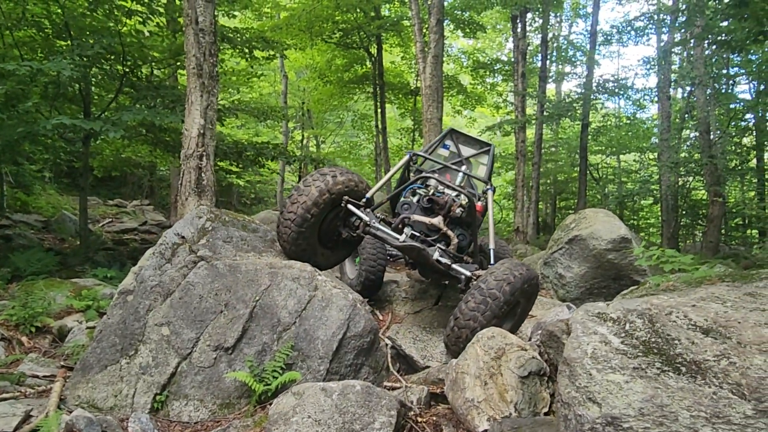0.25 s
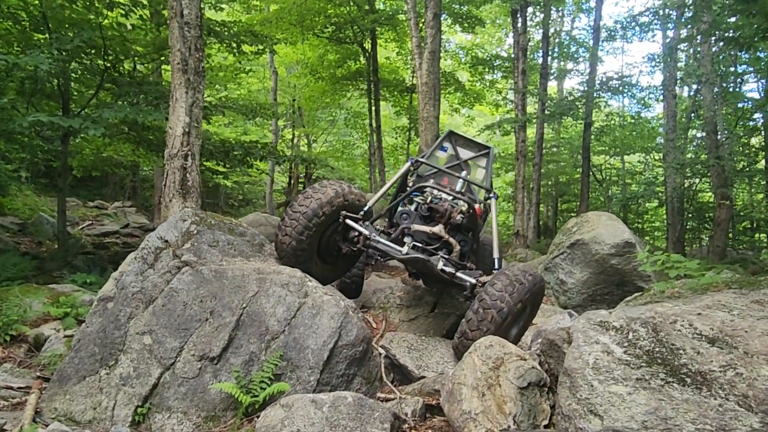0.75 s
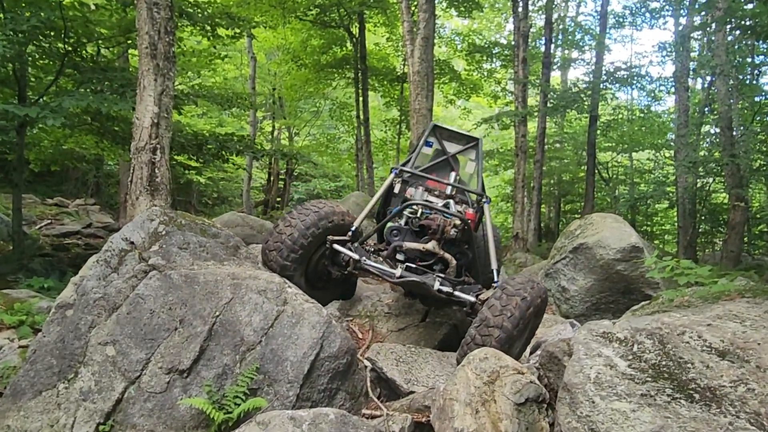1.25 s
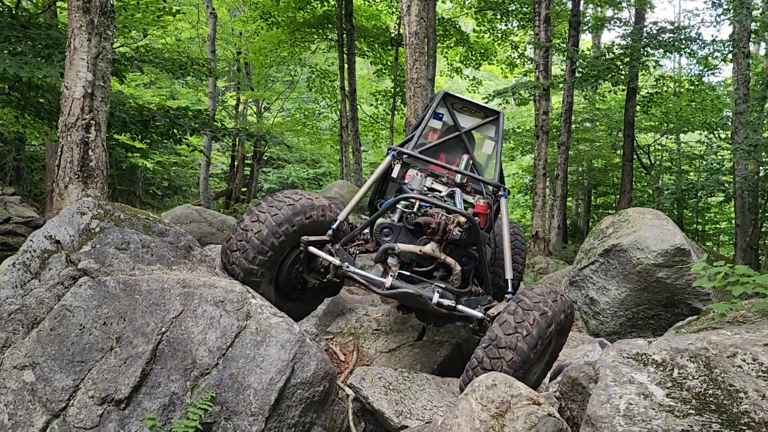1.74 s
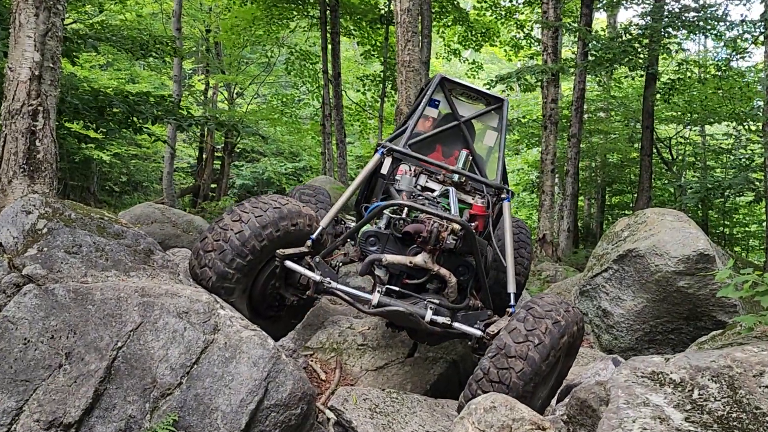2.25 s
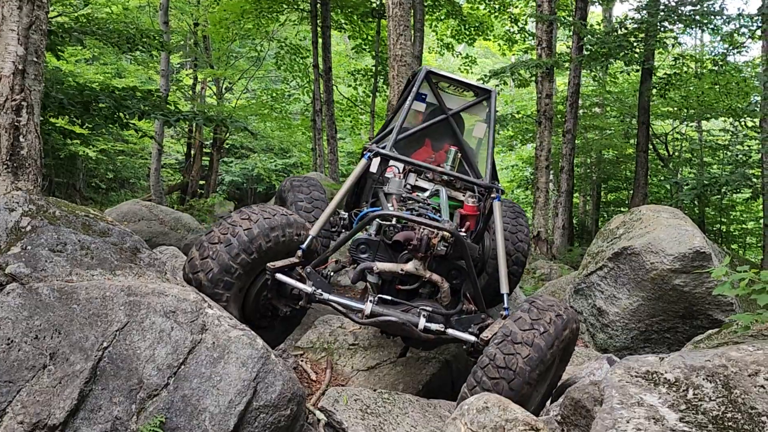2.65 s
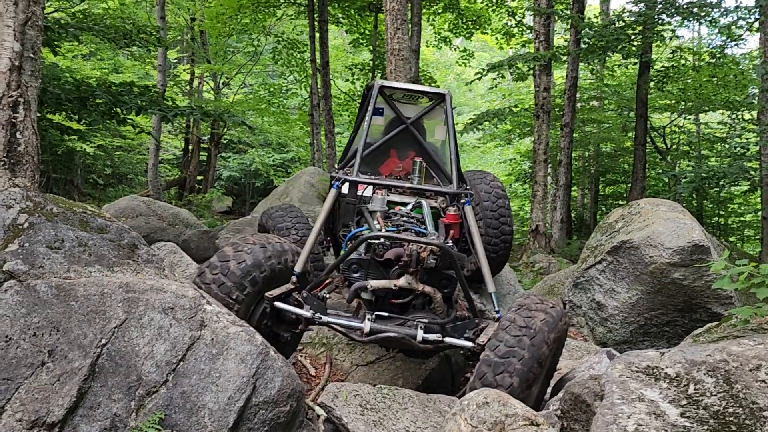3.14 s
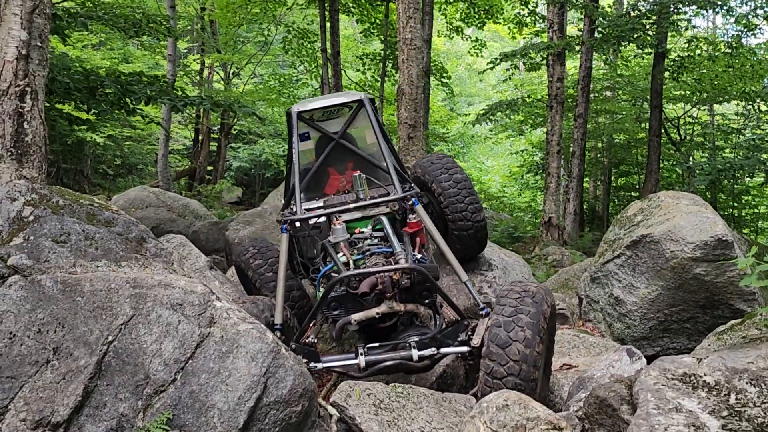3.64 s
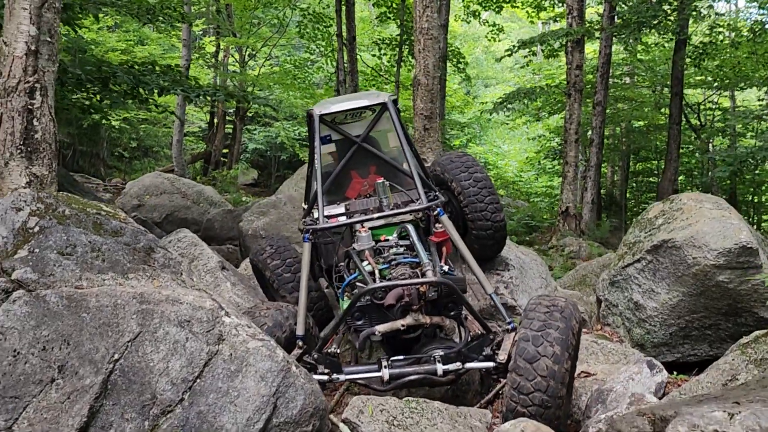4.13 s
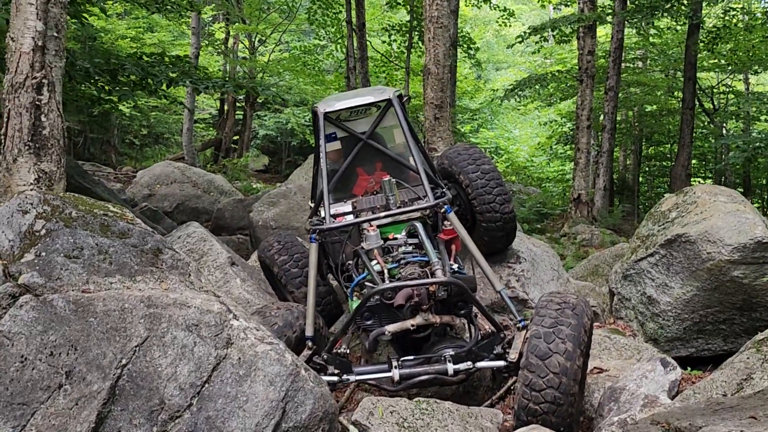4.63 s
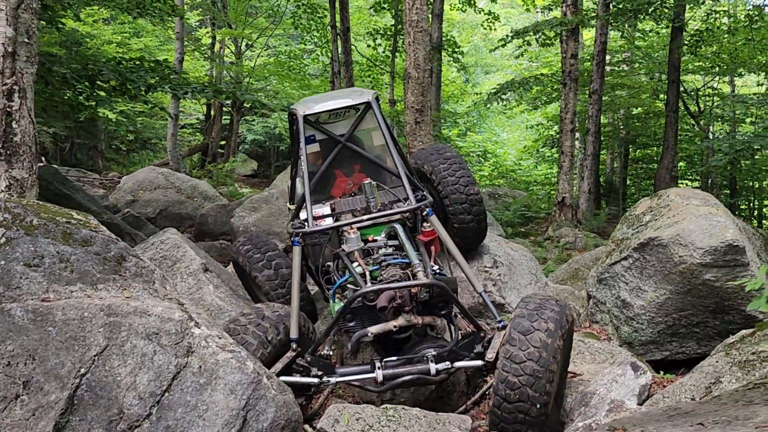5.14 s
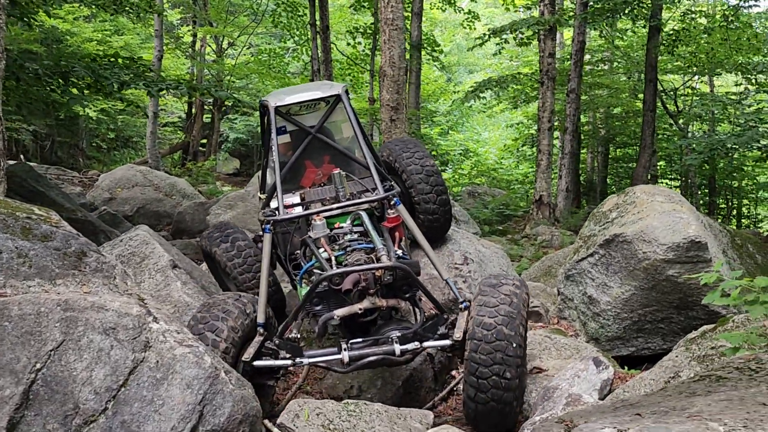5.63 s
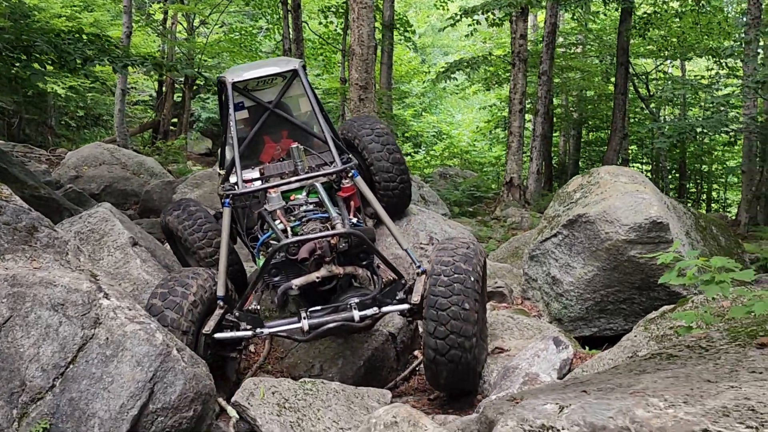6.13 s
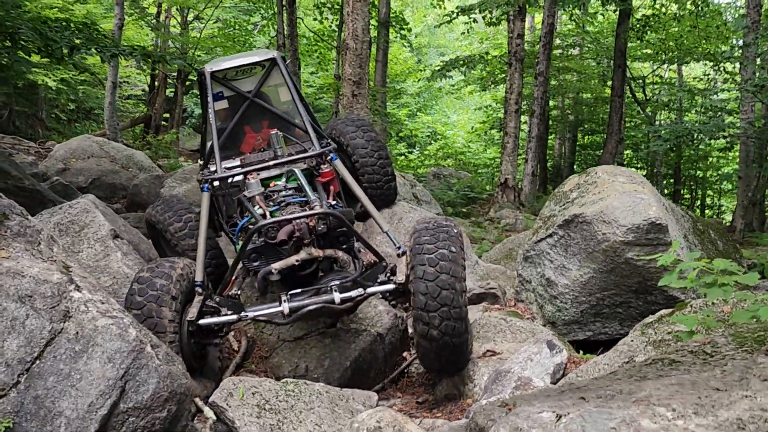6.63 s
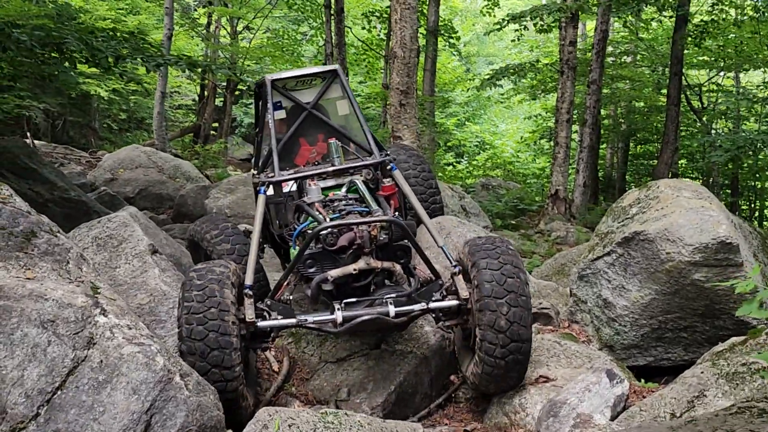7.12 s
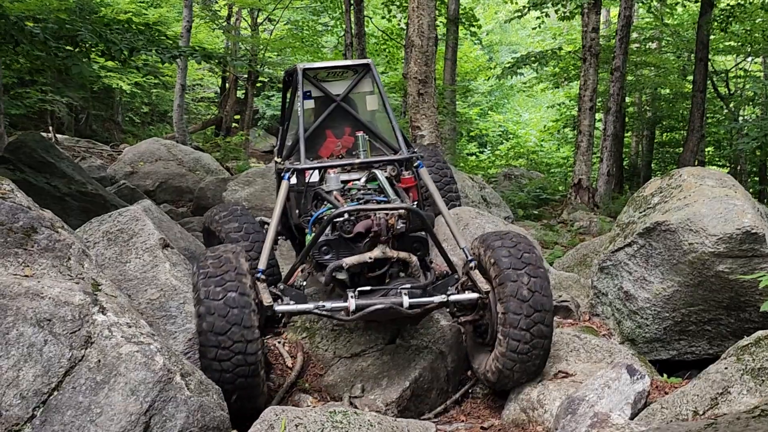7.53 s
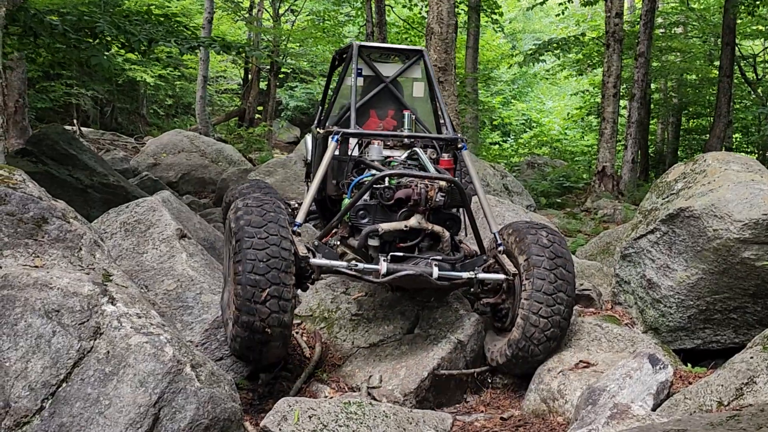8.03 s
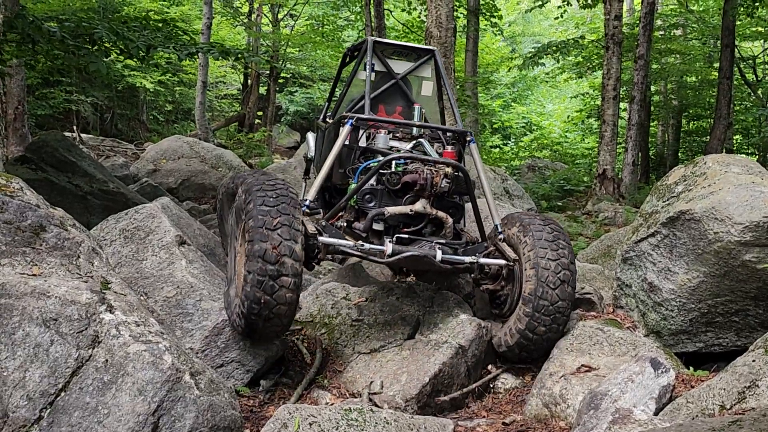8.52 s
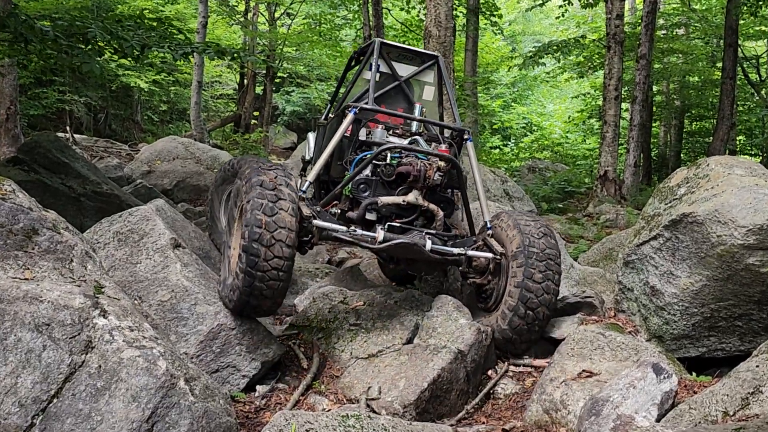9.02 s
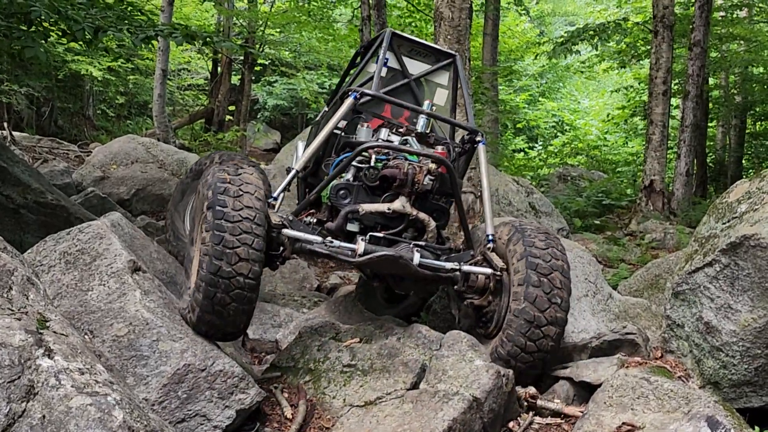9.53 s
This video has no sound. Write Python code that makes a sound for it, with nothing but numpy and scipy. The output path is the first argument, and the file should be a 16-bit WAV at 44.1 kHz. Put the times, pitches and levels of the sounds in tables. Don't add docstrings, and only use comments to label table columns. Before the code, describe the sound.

Close by among trees, a rock-crawling buggy's lumpy engine roars, drops to a burble and roars again, hissing, rattling and chirping on rock.

```python
import sys
import numpy as np
from scipy import signal
from scipy.fft import rfft, irfft, next_fast_len
from scipy.io import wavfile
from scipy.ndimage import uniform_filter1d

SR = 44100
rng = np.random.default_rng(int(sys.argv[2]) if len(sys.argv) > 2 else 0)


def attenuation_scalar(level_db):
    decades = np.asarray(level_db, float) / 20
    return 10 ** decades


def wrap_up_sound(samples):
    columns = np.atleast_2d(samples).T
    tamed = np.clip(columns, -1, 1)
    steps = np.round(tamed * 32767).astype(np.int16)
    wavfile.write(sys.argv[1], SR, steps)


N = 430857
T = np.arange(N) / SR

# (centre [Hz], width [Hz], depth [0-1])
GROUND_DIPS = [(1860, 110, .88), (2600, 90, .35), (3270, 90, .25)]
# (frequency [Hz], phase [rad])
PORT_LAG = [(0, 0), (1030, 0.2), (1290, 0.9), (1550, 0.7), (1980, 0.7), (2410, 5.5), (2930, 6.1),
            (5770, 9.1), (6630, 10.5), (7840, 15.6), (8700, 16.7), (11900, 18.6), (14700, 22.6),
            (16000, 24.3)]
# (frequency [Hz], level [dB])
PORT_DB = [(60, 0.5), (110, 0.0), (200, -0.5), (380, -0.5), (700, -1.0), (1290, -1.5), (2380, -2.0),
           (4400, -7.5), (8120, -3.0), (15000, -2.5)]
# (frequency [Hz], likeness [0-1])
ALIKE = [(300, .98), (700, .95), (1500, .88), (3000, .7), (8000, .58), (16000, .5)]

# (frequency [Hz], density [dB/Hz])
RATTLE = [(45, -4.5), (88, 3.5), (150, 2), (240, -3), (355, -15), (679, -7.5), (764, -17.5), (1960, -20),
          (2200, -18), (3660, -26), (5420, -21.5), (10400, -38), (15000, -65), (16300, -61)]
# (time [s], length [s], start pitch [Hz], width [Hz], level [dB])
SQUEAKS = [
    (3.73, .22, 3040, 90, -34),
    (3.715, .25, 2740, 200, -40),
    (5.11, .14, 5050, 300, -18.5),
    (5.62, .05, 5230, 200, -24.5),
    (5.76, .42, 5270, 260, -23),
    (6.42, .07, 5200, 250, -26),
    (6.5, .07, 5570, 200, -21.5),
    (8.865, .32, 10800, 110, -29),
    (9.61, .03, 10550, 110, -39),
    (9.68, .25, 10520, 90, -39),
]
# (time [s], pitch [Hz], level [dB])
FAN = [
    (0, 4100, -39),
    (.15, 3780, -41),
    (.45, 4000, -40),
    (.8, 4500, -39),
    (1.05, 4780, -36),
    (1.3, 4700, -40),
    (1.45, 4250, -35),
    (1.66, 3790, -45),
]
# (time [s], pitch [Hz], level [dB])
GEAR = [
    (4.0, 2250, -42),
    (4.25, 2185, -32),
    (4.55, 2135, -32),
    (4.85, 2180, -29.5),
    (4.95, 2130, -39),
    (6, 2130, -35),
    (6.6, 2120, -39),
    (7.1, 2120, -37),
]

# (frequency [Hz], density [dB/Hz])
JET = [(500, -43), (900, -31), (1300, -30.5), (2100, -5.5), (3300, -10), (5000, 0.5), (7400, -13.5),
       (8500, -14.5), (10300, -26), (12000, -14), (14000, -13), (16000, -13.5)]
# (frequency [Hz], width [Hz], level [dB])
FRAME = [(2215, 67, -7), (2960, 150, -9), (3600, 130, -11), (4033, 220, -2.2), (4570, 83, -18.5),
         (5580, 200, -5), (6220, 150, -5), (7575, 660, -3)]
# (frequency [Hz], width [Hz], level [dB])
CLANG = [(1054, 260, -7), (1323, 54, -6.5), (1558, 89, -1.5)]
# (frequency [Hz], width [Hz], level [dB])
HEADER = [(464, 46.3, 10), (498, 38, 2.5), (529, 26.5, 0.5), (658, 78, -3.5)]
# (frequency [Hz], width [Hz], level [dB])
MUFFLER = [(252.7, 18.2, 0.37), (333.3, 53, 0.1)]
# (frequency [Hz], width [Hz], level [dB])
SKID_PLATE = [(148, 36, 0.1)]
HEADER_RUNG_DB = [-8, -10, 0, -6]
CAN_RUNG_DB = [-6, 0, -7, -1]
CLANG_RUNG_DB = [-5, -2.5, 0, -2]
PLATE_RUNG_DB = [-18, 0, -18, -14]
# (time [s], level [dB])
HEADERS_IN_VIEW = [(0, 5), (.3, 0.5), (.5, 8.5), (1.2, 12), (1.5, -4.5), (3.2, -1.5), (3.8, 7), (4.6, -5),
                   (7.2, -4.5), (7.7, -1), (8.3, 1), (9.77, -2.5)]
# (gas level [dB], share [0-1])
PULSED_BY_GAS = [(-51, 0.45), (-35, 1), (-53.5, 0.85), (-37.5, 0.91)]

# (frequency [Hz], level [dB])
BASS = [(25, -36), (50, -26), (92, -16.5), (106, -21.5), (121, -16), (138, -21), (153, -24), (180, -19.5)]
ORDER_DB = [1, 1.3, -4.5]
# (order [-], level [dB])
UPPER = [(4, 3.5), (5, 3.25), (6, -0.5), (7, -2.5), (8, -6), (9, -38.5), (10, -49)]
# (frequency [Hz], level [dB])
PIPE = [(105, 2), (135, -1), (185, 0), (230, -2.9), (280, -2.5), (330, 3), (385, 3.5), (450, -52)]
NOTE_SCATTER_DB = [.6, 1.1]
# (time [s], silencer can in view [dB], boom off near rock [dB])
STANCE = [(0, -7, 4.5), (1.0, -2, 3), (1.8, -21.5, 0), (2.7, -11.5, -1.5), (3.3, 20, 1), (4.4, 10, 5),
          (5.1, 16, 5), (5.7, 11, 3.5), (6.3, 6.5, -2), (7.1, 6.5, 0), (7.6, 15, 3.5), (8.6, 14.5, 0),
          (9.3, 17, -6.5), (9.77, 18, -5.5)]
# (time [s], thump level [dB], gas level [dB])
LOAD = [(0, -7, -47.5), (.12, -7.5, -42.5), (.45, 0, -25.5), (1.09, -4, -34), (1.42, -6.5, -48),
        (1.66, -3.5, -41), (1.9, -0.5, -33), (3.15, 0.5, -32.5), (3.45, -7, -47), (3.75, -11, -53),
        (4.11, -12, -46.5), (4.75, -2.5, -28.5), (5.45, -2.5, -31.5), (6.67, -2, -32), (7.2, -7, -42.5),
        (7.36, -1.5, -20.5), (7.9, 2, -26), (9.77, -3.5, -35)]
# (thump level [dB], gas level [dB], lateness [firing periods])
CYLINDERS = [(-1.2, -2.3, .013), (.8, .1, -.008), (-.3, .5, -.013), (1.3, -.6, .008)]
# (time [s], rate [firings/s])
RATE = [(0, 23.71), (.35, 33.89), (.58, 55.19), (1.11, 63.34), (1.47, 21.67), (2.06, 37.82), (2.59, 36.3),
        (3.32, 43.25), (3.91, 23.15), (4.41, 27.32), (5.1, 41.14), (5.98, 34.18), (6.74, 33.93),
        (7.24, 26.4), (7.49, 43.96), (7.93, 52.04), (8.31, 46.58), (9.77, 45.75)]

TREES_T60_S, TREES_DB = 0.63, -10.5
RATTLE_DB, SQUEAK_SAG = -28.5, .032
CAN_DB, SKID_PLATE_DB, CLANG_DB = -41, -43.5, 3.5
METAL_SCATTER_DB = 2.3
CLANG_IN_VIEW, UPPER_IN_VIEW = 0.12, 0.15
ROCK_MASKS, ROCK_ON_FOURTH = 0.44, 0.69
EDGE_IN_VIEW = 0.67
UPPER_DB = -32
HIDDEN_DB_PER_OCTAVE, IN_VIEW_DB = 0.4, 14
PULSED_LOSS_PER_OCTAVE, PULSED_FROM_HZ = 0.3, 39.4
BURST_RISE_S = .0007
START_TURN, JITTER = .35, .004
FLYWHEEL_S, LIFT_OFF_S, LIFT_SAG_HZ_PER_S = .205, 9.47, 13.7
LOW_CUT_HZ, TOP_HZ = 32, 15850


def curves(table):
    s, *columns = np.transpose(table)
    return [np.interp(T, s, c) for c in columns]


def unit(x):
    return x / np.sqrt(np.mean(x ** 2))


def smooth(x, k, **edge):
    return uniform_filter1d(uniform_filter1d(x, k, **edge), k, **edge)


def even(x, span_s=0.16):
    return x / np.sqrt(smooth(x ** 2, int(span_s * SR)) + 1e-12)


def ring(x, hz, width):
    return signal.lfilter(*signal.iirpeak(hz, hz / width, SR), x)


def on_bins(table, size):
    hz, value = np.transpose(table)
    return np.interp(np.log(np.arange(size // 2 + 1) * SR / size + 1), np.log(hz + 1), value)


def colour(x, table):
    size = next_fast_len(N)
    return unit(irfft(rfft(x, size) * attenuation_scalar(on_bins(table, size)), size)[:N])


def walk(rate, count=N):
    k = int(SR / rate)
    held = np.repeat(rng.standard_normal(N // k + 1), k)[:count]
    return 1.3 * smooth(held, k)


def trees(size):
    t = T[:SR // 2]
    echo = rng.standard_normal((2, len(t))) * (t > .015) * np.exp(-np.log(1000) * t / TREES_T60_S)
    return attenuation_scalar(TREES_DB) * rfft(echo / np.sqrt(np.sum(echo[0] ** 2)), size)


def ground(bins_hz):
    dips = [1 - depth / (1 + ((bins_hz - dip_hz) / width) ** 2) for dip_hz, width, depth in GROUND_DIPS]
    return np.prod(dips, axis=0)


def rattle(hz):
    level_db = RATTLE_DB + 5.7 * np.log2(hz / 27) + 1.36 * walk(25)
    return attenuation_scalar(level_db) * colour(rng.standard_normal(N), RATTLE)


def squeaks():
    out = np.zeros(N + SR)
    for s, length, hz, width, db in SQUEAKS:
        n = int(length * SR)
        part = np.arange(n) / n
        shape = np.minimum(part / 0.1, 1) * (1 - part) ** 0.9
        phase = 2 * np.pi * np.cumsum(hz * (1 - SQUEAK_SAG * np.sqrt(part))) / SR
        grain = walk(2 * width, n) * np.sin(phase) + walk(2 * width, n) * np.cos(phase)
        start = int(s * SR)
        out[start:start + n] += attenuation_scalar(db + 2.6 * walk(45, n)) * shape * grain
    return out[:N]


def whine(table, rough_hz):
    hz, db = curves(table)
    first_s, last_s = table[0][0], table[-1][0]
    gate = np.interp(T, [first_s - .05, first_s, last_s, last_s + 0.44], [0, 1, 1, 0])
    phase = 2 * np.pi * np.cumsum(hz) / SR
    level = gate * attenuation_scalar(db + 2.1 * walk(30))
    return level * ((.9 + .7 * walk(rough_hz)) * np.sin(phase) + .7 * walk(rough_hz) * np.cos(phase))


def speed():
    asked = smooth(curves(RATE)[0], int(FLYWHEEL_S * SR), mode="nearest")
    return asked - LIFT_SAG_HZ_PER_S * np.clip(T - LIFT_OFF_S, 0, None)


def firings(hz):
    turns = START_TURN + np.cumsum(hz) / SR
    k = np.arange(420)
    late = np.array(CYLINDERS)[k % 4, 2] + JITTER * rng.standard_normal(len(k))
    return np.interp(k + late, turns, T, left=-.01, right=N / SR + 1)


def puffs(hz, at):
    pulsed = np.interp(curves(LOAD)[1], *np.transpose(PULSED_BY_GAS))
    blur = PULSED_LOSS_PER_OCTAVE * np.log2(np.maximum(hz / PULSED_FROM_HZ, 1))
    pulsed = np.clip(pulsed - blur, 0, 1)
    last = np.clip(np.searchsorted(at, T) - 1, 0, None)
    since = np.abs(T - at[last])
    chance = rng.standard_normal((len(at), 13))[last]
    size_db = np.array(CYLINDERS)[last % 4, 1] + 1.5 * chance[:, 12]
    decay = np.exp(-since / 0.0063) + 0.44 * np.exp(-since / 0.018)
    burst = (1 - np.exp(-since / BURST_RISE_S)) * decay
    return pulsed * even(burst * attenuation_scalar(size_db)) + 0.84 * (1 - pulsed), chance, last % 4


def metal(modes, puff, chance, first, rung_db=0):
    total = np.zeros(N)
    for k, (hz, width, db) in enumerate(modes):
        hit_db = rung_db + METAL_SCATTER_DB * chance[:, first + k]
        hit = puff * attenuation_scalar(hit_db) * rng.standard_normal(N)
        total += attenuation_scalar(db) * ring(hit, hz, width) / np.sqrt(width)
    return even(total)


def gas(puff, chance, cylinder):
    gas_db, view_db = curves(LOAD)[1], np.maximum(curves(HEADERS_IN_VIEW)[0], 0)
    hiss = colour(rng.standard_normal(N), JET)
    edge = signal.sosfilt(signal.butter(2, 9000, "highpass", fs=SR, output="sos"), hiss)
    jet = (hiss + 0.37 * attenuation_scalar(EDGE_IN_VIEW * view_db) * edge * puff) * puff
    frame = metal(FRAME, puff, chance, first=3)
    clang = metal(CLANG, puff, chance, first=0, rung_db=np.array(CLANG_RUNG_DB)[cylinder])
    clang_db = CLANG_DB - 5.5 + CLANG_IN_VIEW * curves(STANCE)[0]
    return attenuation_scalar(gas_db) * (attenuation_scalar(2.0) * even(jet) + attenuation_scalar(3.0) * frame + attenuation_scalar(clang_db) * clang)


def cavity(at, modes, db, scatter_db, rung_db, hiss):
    pulses = hiss * rng.standard_normal(N)
    heard = (at > 0) & (at < T[-1])
    size_db = scatter_db * rng.standard_normal(len(at)) + np.resize(rung_db, len(at))
    pulses[(at[heard] * SR).astype(int)] -= attenuation_scalar(size_db)[heard]
    rung = sum(attenuation_scalar(g) * ring(ring(pulses, hz, width), hz, 1.39 * width) / width for hz, width, g in modes)
    return attenuation_scalar(db) * even(rung)


def exhaust(hz, at):
    thump_db, (view_db, rock_db) = curves(LOAD)[0], curves(STANCE)
    first_db, second_db, third_db = (thump_db + db + np.interp((k + 1) * hz, *np.transpose(BASS))
                                     for k, db in enumerate(ORDER_DB))
    second_db = second_db - ROCK_MASKS * rock_db
    third_db = third_db + rock_db
    upper_db = thump_db + UPPER_DB + UPPER_IN_VIEW * view_db
    k = np.arange(len(at))
    angle = 2 * np.pi * (np.interp(T, at, k) - .1)
    scatter_db = rng.standard_normal((len(at), 2)) * NOTE_SCATTER_DB
    strength_db = np.array(CYLINDERS)[k % 4, 0, None] + scatter_db
    low, high = (attenuation_scalar(np.interp(T, at + 0.00078, s)) for s in strength_db.T)
    note = attenuation_scalar(first_db) * np.cos(angle - .4)
    note -= attenuation_scalar(second_db) * np.cos(2 * angle)
    note -= attenuation_scalar(third_db) * np.cos(3 * angle)
    note *= low
    for order, db in UPPER:
        octaves = np.log2(np.maximum(order * hz / 200, 1))
        pipe_db = np.interp(order * hz, *np.transpose(PIPE))
        pipe_db -= HIDDEN_DB_PER_OCTAVE * np.maximum(IN_VIEW_DB - view_db, 0) * octaves
        boom_db = (order == 4) * ROCK_ON_FOURTH * rock_db
        note -= high * attenuation_scalar(upper_db + db + pipe_db + boom_db) * np.cos(order * angle)
    return np.sqrt(2) * note


def scene():
    hz = speed()
    thump_db, gas_db = curves(LOAD)
    can_view_db = curves(STANCE)[0]
    at = firings(hz)
    puff, chance, cylinder = puffs(hz, at)
    tones = squeaks() + whine(FAN, 380.) * np.sqrt(puff) + whine(GEAR, 110.)
    tones += cavity(at, HEADER, gas_db + curves(HEADERS_IN_VIEW)[0],
                    scatter_db=1.3, rung_db=HEADER_RUNG_DB, hiss=.005)
    tones += cavity(at, MUFFLER, CAN_DB + thump_db + can_view_db,
                    scatter_db=1.5, rung_db=CAN_RUNG_DB, hiss=.004)
    tones += cavity(at, SKID_PLATE, SKID_PLATE_DB + thump_db + can_view_db,
                    scatter_db=2.5, rung_db=PLATE_RUNG_DB, hiss=.001)
    size = next_fast_len(N + SR)
    front, sides = (rfft(gas(puff, chance, cylinder) + rattle(hz), size) for _ in range(2))
    front = front + rfft(tones, size)
    echo = trees(size)
    alike = np.clip(on_bins(ALIKE, size), 0, 1)
    bins_hz = np.arange(size // 2 + 1) * SR / size
    lead = np.interp(bins_hz, *np.transpose(PORT_LAG))
    tilt = attenuation_scalar(on_bins(PORT_DB, size) / 2) * np.exp(.5j * lead)
    both = np.sqrt((1 + alike) / 2) * front + np.sqrt((1 - alike) / 2) * sides * np.array([[1], [-1]])
    direct = both * np.array([tilt, 1 / tilt])
    note = rfft(exhaust(hz, at), size) * (1 + attenuation_scalar(-16.0) * echo)
    return irfft(ground(bins_hz) * (direct + front * echo) + note, size)[:, :N]


def band_limit(x):
    return signal.sosfilt(signal.butter(12, 16410, fs=SR, output="sos"), x)


def record(dry):
    heard = signal.sosfiltfilt(signal.butter(3, LOW_CUT_HZ, "highpass", fs=SR, output="sos"), dry)
    rounded = np.tanh(0.6 * heard) / 0.58
    top = signal.ellip(10, .2, 60, TOP_HZ, fs=SR, output="sos")
    return band_limit(signal.sosfilt(top, rounded))


dry = scene()
out = record(dry)
wrap_up_sound(out)
```